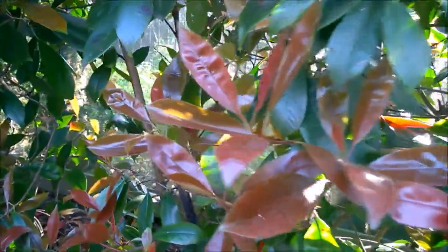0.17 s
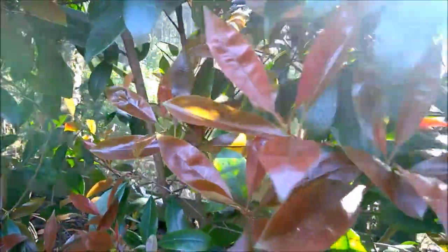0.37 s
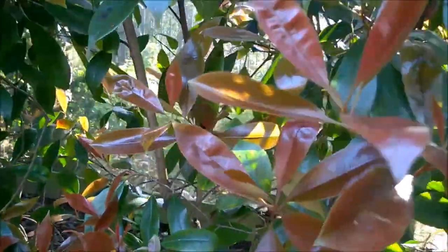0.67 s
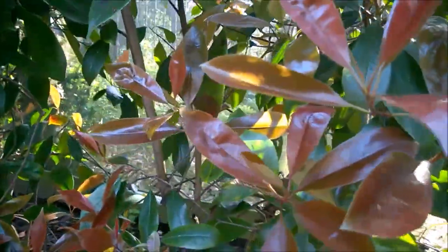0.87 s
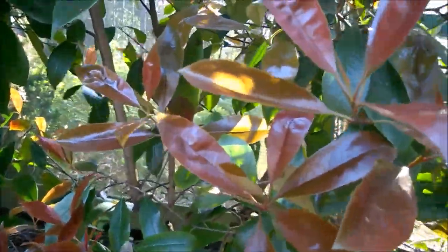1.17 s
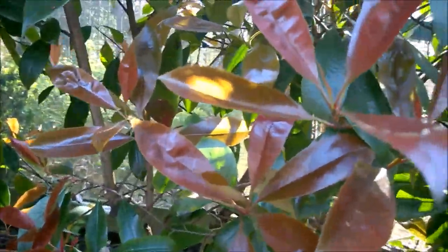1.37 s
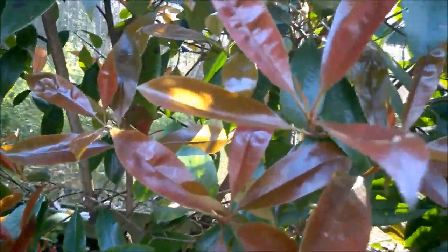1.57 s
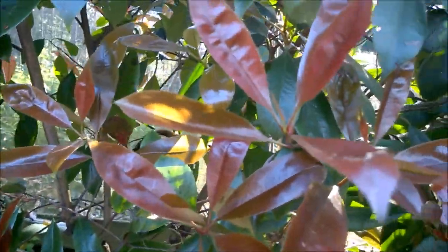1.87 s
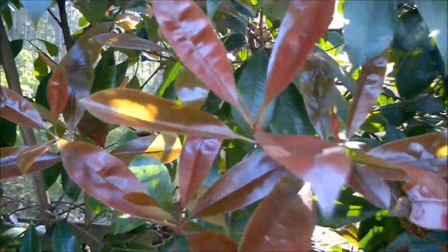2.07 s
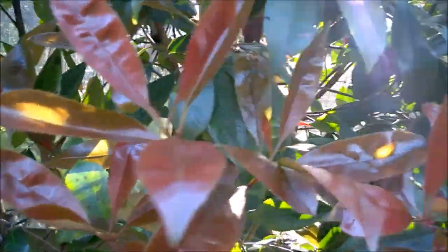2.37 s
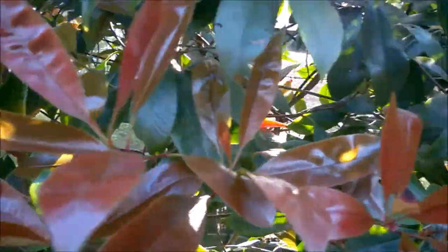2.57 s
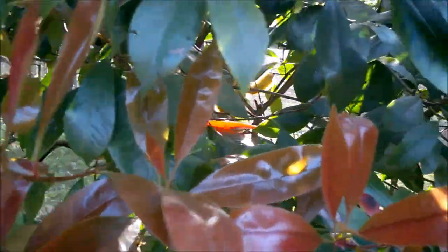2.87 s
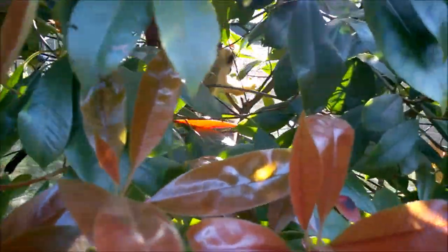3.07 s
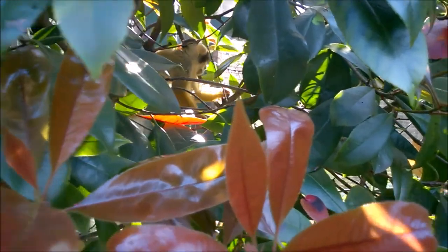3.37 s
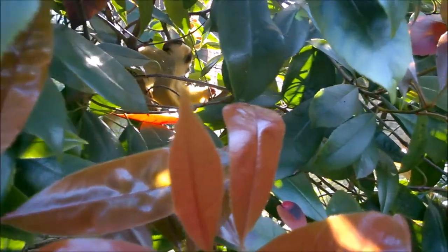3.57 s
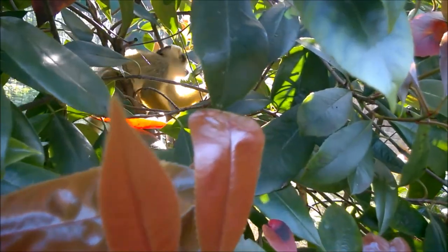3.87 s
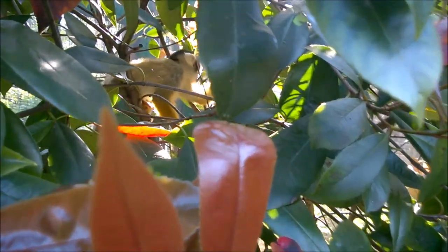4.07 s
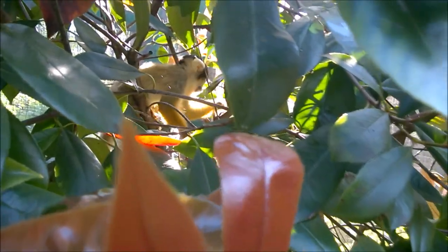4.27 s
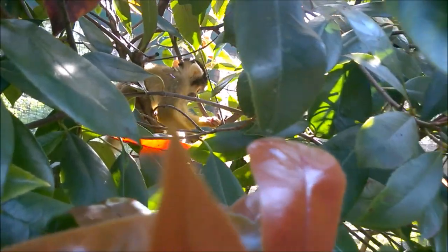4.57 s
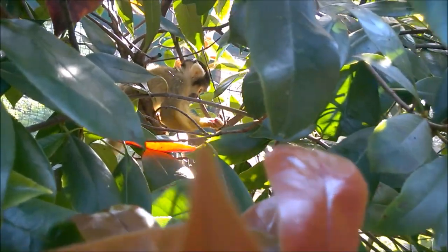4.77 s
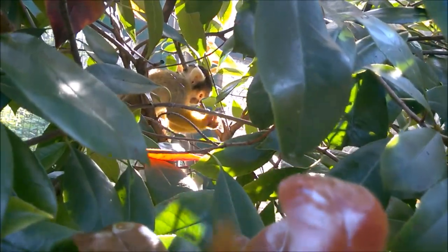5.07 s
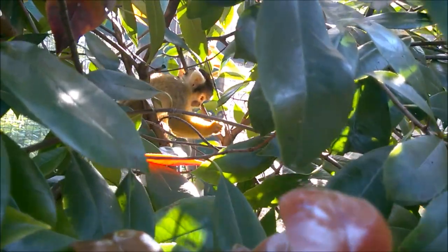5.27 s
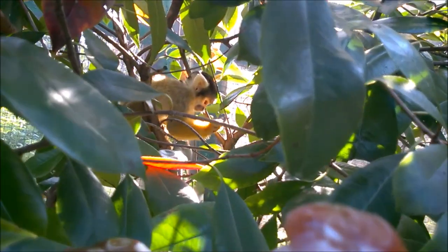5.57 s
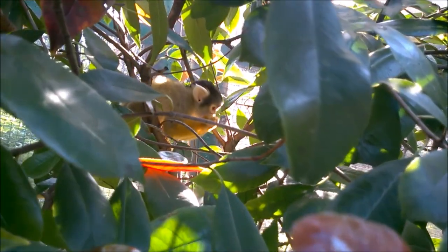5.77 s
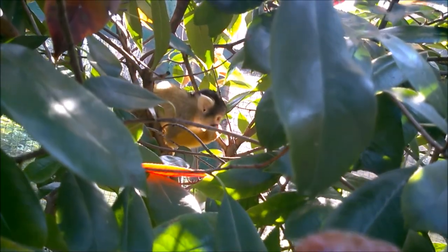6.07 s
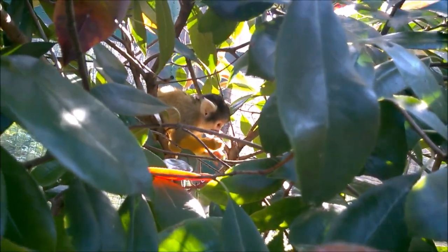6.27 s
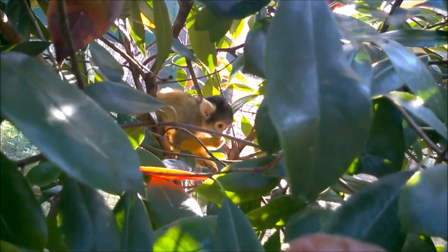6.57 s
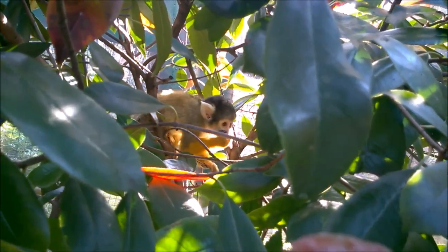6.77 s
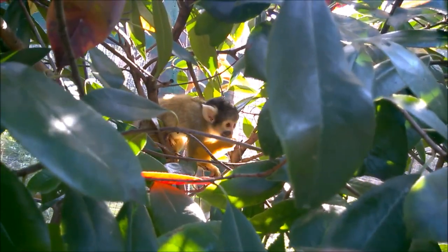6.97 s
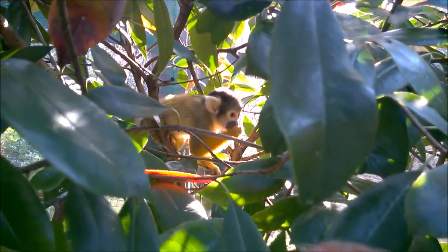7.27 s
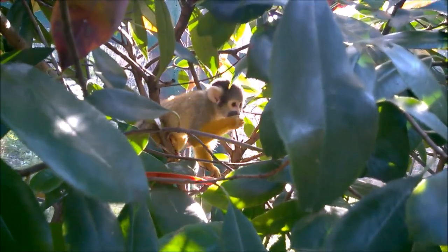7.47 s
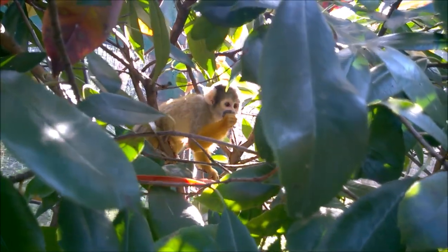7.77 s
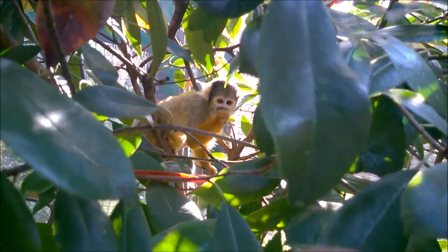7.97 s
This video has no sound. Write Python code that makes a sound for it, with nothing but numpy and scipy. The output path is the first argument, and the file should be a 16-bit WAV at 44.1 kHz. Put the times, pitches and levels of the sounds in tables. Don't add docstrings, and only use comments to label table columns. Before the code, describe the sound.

Bird-like whistles, piping notes, mews, hoots and a rapid shivering trill ring through a leafy enclosure over steady low hum and hiss.

```python
import sys
import numpy as np
from scipy import signal
from scipy.fft import rfft, irfft, next_fast_len
from scipy.io import wavfile
from scipy.ndimage import uniform_filter1d

SR = 44100
rng = np.random.default_rng(int(sys.argv[2]) if len(sys.argv) > 2 else 0)


def attenuation_scalar(level_db):
    decades = np.asarray(level_db, float) / 20
    return 10 ** decades


def put_to_file(sound):
    columns = np.atleast_2d(sound).T
    safe = np.clip(columns, -1, 1)
    whole_steps = np.round(safe * 32767)
    wavfile.write(sys.argv[1], SR, whole_steps.astype(np.int16))


N = 358974


def walk(rate, size=N):
    k = int(SR / rate)
    held = np.repeat(rng.standard_normal(size // k + 1), k)
    return 1.3 * uniform_filter1d(uniform_filter1d(held, k), k)[:size]


def turning(hz):
    return 2 * np.pi * np.cumsum(hz) / SR


def swell(u, power):
    return power * 20 * np.log10(np.sin(np.pi * u).clip(.01, 1))


def sing(table, glide_s, edge_s):
    s, hz, *columns = np.transpose(table)
    t = np.arange(int(s[0] * SR), min(int(s[-1] * SR), N)) / SR
    pitch = uniform_filter1d(np.interp(t, s, hz), int(glide_s * SR), mode="nearest")
    gate = np.sin(np.pi / 2 * np.clip(np.minimum(t - t[0], t[-1] - t) / edge_s, 0, 1))
    return int(s[0] * SR), turning(pitch), np.sqrt(2) * gate, [np.interp(t, s, c) for c in columns]


def add(stage, start, x, pan_db, echo_db):
    gains_db = np.array([[pan_db / 2], [-pan_db / 2], [echo_db]])
    even_db = np.log1p(pan_db ** 2 / 150) * 3.05
    stage[:, start:start + len(x)] += x * attenuation_scalar(gains_db - even_db)


def whistle(stage, call, pan_db, echo_db):
    start, phase, gate, (db,) = sing(call, glide_s=0.006, edge_s=.003)
    level = attenuation_scalar(db + 2 * walk(70, len(gate)))
    add(stage, start, gate * level * np.sin(phase + .3 * walk(150, len(gate))), pan_db, echo_db)


def loops():
    loop_contour = [(0, -.25), (.075, .17), (.21, .3), (.42, .05), (.6, .01), (.775, .25), (.82, .75),
                    (.89, 1), (1, 1)]
    contour_db = [-20, -8, .5, -2, -3, -6, -4, -5, -7]
    # (start [s], length [s], reach [Hz], level [dB], left minus right [dB])
    loop_calls = [
        (0.528, .305, 1786, -29.5, -22),
        (5.678, .284, 2003, -31, -15),
    ]
    # (time [s], pitch [Hz], level [dB])
    hook = [(4.188, 4470, -59), (4.198, 5540, -41), (4.212, 6290, -30), (4.24, 6296, -27.5),
            (4.258, 5680, -34.5), (4.28, 4770, -31.5), (4.305, 4290, -43)]
    dip_hz = 4494
    stage, (u, height) = np.zeros((3, N)), np.transpose(loop_contour)
    for s, length, reach_hz, db, pan_db in loop_calls:
        call = np.transpose([s + length * u, dip_hz + reach_hz * height, db + np.array(contour_db)])
        whistle(stage, call, pan_db, echo_db=5.5)
    whistle(stage, hook, pan_db=-18, echo_db=7.5)
    return stage


def pipes():
    # (start [s], length [s], from [Hz], to [Hz], level [dB])
    pipe_calls = [(1.044, .14, 2897, 2952, -39), (2.0, 0.16, 3863, 3960, -41),
                  (2.403, 0.15, 3860, 3880, -46), (3.563, 0.099, 3773, 3810, -34.5),
                  (4.016, 0.076, 3083, 3090, -27.5), (4.251, 0.19, 3140, 3570, -34.5),
                  (4.604, .125, 2900, 3043, -39), (5.526, 0.085, 4955, 4950, -46),
                  (7.973, 0.13, 1800, 2424, -43), (6.335, .3, 4900, 5060, -56),
                  (2.27, 0.13, 825, 810, -47.5)]
    # (left minus right [dB], echo [dB])
    pipe_seats = [(-20, 2.5), (-5.5, -0.5), (-12.5, 7), (-20, 6.5), (-9.5, -2.5), (-24.5, -10), (4, -2.5),
                  (-3, -18), (2, 1), (-0.5, 3.5), (9, -5.5)]
    attack_s, release_s = 0.01, 0.022
    stage, u = np.zeros((3, N)), np.linspace(0, 1, 40)
    left = (1 - u) ** 3
    for (s, length, from_hz, to_hz, db), seat in zip(pipe_calls, pipe_seats):
        edge = np.minimum(u * length / attack_s, (1 - u) * length / release_s).clip(.05, 1)
        level_db = db + 20 * np.log10(edge) - 25 * left * abs(np.log(to_hz / from_hz))
        whistle(stage, np.transpose([s + length * u, to_hz + (from_hz - to_hz) * left, level_db]), *seat)
    return stage


def mouth_call(stage, call, first_db, pan_db, echo_db):
    start, phase, gate, (db,) = sing(call, glide_s=.01, edge_s=0.0028)
    x = attenuation_scalar(first_db) * np.sin(phase) + np.sin(2 * phase) + attenuation_scalar(-43) * np.sin(4 * phase)
    add(stage, start, gate * x * attenuation_scalar(db + 2 * walk(60, len(x))), pan_db, echo_db)


def mews():
    # (start [s], length [s], crest [Hz], level [dB], left minus right [dB])
    mew_calls = [
        (.835, .22, 984, -30.5, -14.5),
        (5.61, .22, 978, -36, -7),
        (7.52, 0.26, 928, -43, 10),
    ]
    stage, u = np.zeros((3, N)), np.linspace(0, 1, 40)
    fall, crest = .2, .5
    arch = 1 - fall * ((u - crest) * 2) ** 2 * (.5 + .5 * u)
    for s, length, hz, db, pan_db in mew_calls:
        call = np.transpose([s + length * u, hz * arch, db + swell(u ** 1.3, power=1.2)])
        mouth_call(stage, call, first_db=-16, pan_db=pan_db, echo_db=-3)
    return stage


def hoots():
    # (start [s], length [s], pitch [Hz], level [dB], place of the crest [0-1])
    hoot_calls = [
        (2.225, .09, 822, -42, .5),
        (2.438, .075, 808, -23.5, .3),
        (3.208, .09, 827, -24.5, .55),
    ]
    stage, u = np.zeros((3, N)), np.linspace(0, 1, 40)
    for s, length, hz, db, crest in hoot_calls:
        bend = 1 + .6 * (.47 - crest) * (u - crest) ** 2
        level_db = db + swell(u ** (np.log(.5) / np.log(crest)), power=1.5)
        call = np.transpose([s + length * u, hz * bend, level_db])
        mouth_call(stage, call, first_db=-35, pan_db=10, echo_db=-7)
    return stage


def duets():
    # (time [s], pitch [Hz], level [dB])
    duet_calls = [
        [(2.535, 3336, -33), (2.573, 3300, -36), (2.595, 3030, -32.5), (2.64, 3180, -29.5)],
        [(2.65, 2630, -36.5), (2.674, 2689, -28.5), (2.73, 2708, -32.5)],
        [(2.75, 3400, -35.5), (2.785, 3286, -16.5), (2.87, 3237, -22), (3.0, 3230, -23), (3.11, 3227, -28),
         (3.229, 3240, -31.5), (3.3, 3260, -55)],
    ]
    # (partial below [dB], partial above [dB], left minus right [dB], echo [dB])
    duet_voice = [(-12, -6.5, 7, 1.5), (-9, -24.5, 5.5, 0), (-9.5, -17, 0, -3.5)]
    duet_husk = [1.3, .25, .3]
    # (time [s], half width [s], depth [dB])
    duet_breaks = [
        (2.824, 0.021, -12),
        (3.037, 0.0089, -22.5),
        (3.135, .012, -9.5),
    ]
    beat_hz = 340.6
    stage = np.zeros((3, N))
    for call, (low_db, up_db, *place), husk in zip(duet_calls, duet_voice, duet_husk):
        start, phase, gate, (db,) = sing(call, glide_s=0.005, edge_s=0.011)
        t = np.arange(len(gate)) / SR
        phase = phase + husk * walk(200, len(t))
        beat = turning(beat_hz + 12 * walk(30, len(t)))
        throb = 1 + 0.11 * np.sin(turning(66 + 8 * walk(25, len(t))))
        now = t + start / SR
        throb = throb * attenuation_scalar(sum(depth_db * np.exp(-((now - s) / half) ** 2) for s, half, depth_db in duet_breaks))
        below = np.sin(phase - beat) + attenuation_scalar(-22.5) * np.sin(phase - 2 * beat)
        sides = attenuation_scalar(low_db) * below + attenuation_scalar(up_db) * np.sin(phase + beat)
        add(stage, start, gate * attenuation_scalar(db) * (throb * np.sin(phase) + sides), *place)
    return stage


def trill():
    # (time [s], effort [dB], weight of the upper voice [dB])
    trill_effort = [(2.1, -57, -22), (2.26, -32.5, -37), (2.34, -35.5, -9), (2.39, -31.5, 1),
                    (2.7, -34, 1.5), (2.901, -33, 1.5), (3.12, -33.5, -2), (3.38, -28.5, -13),
                    (3.57, -35.5, -10)]
    rate_hz, beat_s = 16.3, 3.39
    time = np.arange(N) / SR
    stage, (s, *columns) = np.zeros((3, N)), np.transpose(trill_effort)
    low_db, upper_db = (np.interp(time, s, c, -120, -120) for c in columns)
    up_db, sweep_db = low_db + upper_db, low_db - 2 + .3 * upper_db
    swing = np.arcsin(.97 * np.cos(turning(69 + 14 * walk(40)))) * .75
    note = rate_hz * (time - beat_s) + 0.025 * walk(19)
    held = (1 + .55 * np.cos(2 * np.pi * note)) * (1 + .5 * swing)
    low = np.sin(turning(4595 + 65 * walk(140))) * attenuation_scalar(low_db + 3 * walk(120))
    up = np.sin(turning(4945 + 75 * walk(140))) * attenuation_scalar(up_db + 3 * walk(120))
    sweep = np.sin(turning(5200 + 850 * swing + 120 * walk(300))) * attenuation_scalar(sweep_db + 1.0 + 1.7 * walk(150))
    add(stage, 0, held * (low + up) + sweep, pan_db=0.2, echo_db=1)
    return stage * attenuation_scalar(-2.0)


def slurs():
    # (start [s], length [s], from [Hz], to [Hz], level [dB])
    chirps_right = [(.37, 0.027, 4200, 3750, -47), (3.903, 0.021, 6330, 4600, -32),
                    (3.763, 0.023, 2900, 3480, -37.5), (3.795, 0.02, 3800, 3350, -34),
                    (3.81, 0.011, 3270, 3240, -37), (4.372, 0.03, 3650, 3750, -36),
                    (4.4, .025, 3557, 3150, -34), (4.653, 0.056, 3100, 4030, -48.5),
                    (4.713, 0.053, 3600, 3160, -41), (6.14, 0.054, 2700, 2305, -49),
                    (6.7, 0.058, 2700, 3230, -48)]
    # (start [s], length [s], from [Hz], to [Hz], level [dB])
    chirps_ahead = [(6.63, .062, 3350, 2200, -41), (7.13, 0.055, 3400, 2300, -41.5),
                    (3.548, 0.013, 5300, 5650, -38), (7.195, .04, 2400, 3100, -47),
                    (8.06, 0.03, 7040, 5400, -42), (8.084, .02, 5600, 5040, -41),
                    (7.79, .02, 3780, 3640, -47), (6.43, .05, 4500, 3900, -51), (6.62, .2, 5150, 5600, -55),
                    (7.82, .13, 1774, 1853, -51), (7.715, .03, 1780, 1680, -45),
                    (7.04, .09, 3900, 3000, -50)]
    stage = np.zeros((3, N))
    flutter = [(4.437 + k * .039, 0.032, 3500, 2960, -31 - 5 * k) for k in range(4)]
    seated = [(*row, -8.5) for row in [*chirps_right, *flutter]] + [(*row, 1) for row in chirps_ahead]
    for s, length, from_hz, to_hz, db, pan_db in seated:
        start, phase, gate, _ = sing([(s, from_hz), (s + length, to_hz)], glide_s=.002, edge_s=.35 * length)
        level = attenuation_scalar(db + 2 * walk(250, len(gate)))
        husky = np.sin(phase + .5 * walk(400, len(gate)))
        add(stage, start, gate * level * husky, pan_db, echo_db=-1.5)
    return stage


def peeps():
    # (start [s], length [s], centre [Hz], level [dB], left minus right [dB])
    peep_calls = [(.465, 0.025, 7220, -46.5, -20), (0.468, 0.037, 4930, -47, -3),
                  (1.118, 0.046, 6520, -45, 5), (2.456, 0.09, 6550, -56.5, 4), (3.2, .04, 6200, -38.5, 0),
                  (3.84, .11, 6790, -38.5, 15), (3.879, 0.066, 5490, -35, -14),
                  (6.267, 0.098, 6960, -46, -14), (6.827, 0.046, 6510, -41, 4),
                  (7.007, 0.059, 6800, -40.5, -1.5), (7.097, 0.041, 6670, -46, -11),
                  (7.977, 0.05, 5620, -46, -6), (0.55, 0.056, 6640, -51, -8),
                  (2.718, 0.098, 6700, -49.5, -2), (4.161, 0.031, 5560, -35.5, -1.5),
                  (3.382, 0.08, 3520, -40.5, -10), (3.423, 0.083, 3095, -40.5, -10),
                  (4.43, 0.17, 3374, -39.5, -16), (4.841, 0.096, 4060, -43.5, -8),
                  (3.77, 0.13, 3410, -40.5, -12.5)]
    stage = np.zeros((3, N))
    for s, length, hz, db, pan_db in peep_calls:
        swing_hz = 311 * attenuation_scalar(.8 * (db + 40))
        start, phase, gate, _ = sing([(s, hz), (s + length, hz)], glide_s=.002, edge_s=.3 * length)
        shivers = [turning(swing_hz * walk(700, len(gate)).clip(-1.3, 1.3)) for _ in range(3)]
        add(stage, start, gate * attenuation_scalar(db - 5) * np.sin(phase + shivers).sum(axis=0), pan_db, echo_db=5.5)
    return stage


def twigs():
    # (time [s], peak level [dB])
    ticks = [
        (1.1262, -15),
        (1.9194, -10),
    ]
    stage, t = np.zeros((3, N)), np.arange(300) / SR
    for s, db in ticks:
        snap = signal.lfilter([1, -1.4, .6], 1, rng.standard_normal(300))
        add(stage, int(s * SR), attenuation_scalar(db - 1.5) * snap * np.exp(-t / 0.00063), pan_db=-5.0, echo_db=-10)
    return stage


def surroundings(x, t60_s, gap_s, echoes):
    t = np.arange(int(1.6 * SR)) / SR
    decay = attenuation_scalar(-60 * t / t60_s) * np.clip(t / gap_s, 0, 1)
    for lag, smear, db in echoes:
        decay = decay + attenuation_scalar(db) * np.exp(-((t - lag) / smear) ** 2)
    noise = rng.standard_normal((2, len(t)))
    dull = signal.sosfiltfilt(signal.butter(2, 5500, fs=SR, output="sos"), noise)
    treble_t60_s = .5
    tail = (dull + (noise - dull) * attenuation_scalar(-30 * t / treble_t60_s)) * decay
    return signal.fftconvolve(x[None], tail / np.sqrt(np.sum(decay ** 2)), axes=1)[:, :N]


def chorus():
    # (time [s], liveliness [dB], lean to the higher choirs [dB])
    chorus_mood = [(0.0, -37, -0.5), (0.48, -42, -14), (0.9, -39, 3), (1.4, -47.5, -4),
                   (1.92, -40.5, -16.5), (2.2, -37.5, -2.5), (2.56, -45, 6), (2.9, -40.5, 7.5),
                   (3.22, -47.5, -3), (3.6, -45, 11.5), (4.08, -37.5, -3), (4.5, -33.5, -13),
                   (4.9, -41.5, -3.5), (5.6, -35, -1), (6.0, -41.5, -6), (7.1, -36, -1), (7.5, -47.5, 6),
                   (7.85, -41.5, 3.5)]
    s, low_db, lean_db = np.transpose(chorus_mood)
    mid_db, high_db = low_db + lean_db, low_db + 2.2 * lean_db - 6
    # (number of slurs, lowest Hz, highest Hz, level dB)
    choirs = [(700, 2150, 3850, low_db - 1.9), (500, 3300, 5200, mid_db - 4.0), (700, 3600, 7400, high_db - 8)]
    out = np.zeros(N + SR)
    for count, low_hz, top_hz, db in choirs:
        for when, start, rising, length, size in rng.random((count, 5)):
            t = np.linspace(0, 1, int((.015 + .03 * length) * SR))
            hz = low_hz + (top_hz - low_hz) * (start + (t if rising < .3 else 1 - t)) / 2
            at = int(when * N)
            level = attenuation_scalar(np.interp(at / SR, s, db) - 1.4 * size)
            out[at:at + len(t)] += level * np.sin(np.pi * t) * np.sin(turning(hz))
    return out[:N]


def air():
    # (frequency [Hz], level per Hz [dB])
    air_colour = [(25, -8.5), (134, -3), (578, -10.5), (1340, -17), (2500, -15), (3840, -17.5), (4770, -19),
                  (7170, -23)]
    # (frequency [Hz], left-right likeness [0-1])
    likeness = [(40, 0.3), (120, 0.28), (1000, 0.02), (2500, 0.5), (7000, 0.03)]
    # (frequency [Hz], left minus right [dB])
    side_lean = [(50, -1.5), (100, 5.5), (300, 0), (1000, 0.5), (3000, 0.5)]
    size = next_fast_len(N)
    f = np.log(np.maximum(np.arange(size // 2 + 1) * SR / size, 1))
    curves = [np.array(c) for c in (air_colour, likeness, side_lean)]
    colour, like, lean = (np.interp(f, np.log(c[:, 0]), c[:, 1]) for c in curves)
    mid, side = rfft(rng.standard_normal((2, size)))
    like, sign = like.clip(0, 1), np.array([[1], [-1]])
    spectrum = attenuation_scalar(colour + sign * lean / 2) * (np.sqrt(1 + like) * mid + sign * np.sqrt(1 - like) * side)
    out, gust = 0, walk(0.21)
    for centre in np.arange(np.log(20), np.log(12000), .5):
        band = np.cos(np.pi * np.clip(f - centre, -.5, .5)) ** 2
        out = out + irfft(spectrum * band, size)[:, :N] * attenuation_scalar(.5 * gust + 0.26 * walk(4))
    return out * attenuation_scalar(-38 - 1.0) / np.sqrt(np.mean(out.mean(axis=0) ** 2))


def scene():
    stage = loops() + pipes() + mews() + hoots() + duets() + trill() + slurs() + peeps() + twigs()
    hedges = [(.062, 0.0069, -11.5), (.14, 0.0091, -14.5)]
    echoes = surroundings(stage[2], t60_s=0.95, gap_s=0.014, echoes=hedges)
    far = surroundings(chorus(), t60_s=0.27, gap_s=0.0031, echoes=[])
    return stage[:2] + echoes + far + air()


def starve(x, band_hz, under_db, up_db, down_db, weak_db):
    top_hz = 7520
    f, _, z = signal.stft(x, SR, "cosine", 4096, 2048)
    band = (f // band_hz).astype(int).clip(0, int(top_hz // band_hz))
    power = np.sum(np.abs(z) ** 2, axis=0)
    each = np.add.reduceat(power, np.flatnonzero(np.diff(band, prepend=-1)), axis=0)
    middle = np.arange(len(each)) + .5
    octaves = np.log2(middle[:, None] / middle)
    slope_db = np.where(octaves > 0, up_db * octaves, -down_db * octaves)
    hidden = attenuation_scalar(2 * (-under_db - slope_db)) @ each
    strip = uniform_filter1d(power, size=6, axis=0)
    around = np.exp(uniform_filter1d(np.log(power + 1e-18), size=70, axis=0))
    strong = strip > attenuation_scalar(2 * weak_db) * around * np.clip(f / top_hz, 0, 1)[:, None]
    keep = (each > hidden)[band] * strong * (f < top_hz)[:, None]
    return signal.istft(z * keep, SR, "cosine", 4096, 2048)[1][:, :N]


def top_cut(x):
    return signal.sosfilt(signal.butter(12, 8730, fs=SR, output="sos"), x)


def record(dry):
    x = signal.sosfilt(signal.butter(2, 48, "high", fs=SR, output="sos"), dry)
    x = starve(x, band_hz=200, under_db=22.5, up_db=22, down_db=70, weak_db=.3)
    return top_cut(x)


dry = scene()
out = record(dry)
put_to_file(out)
```